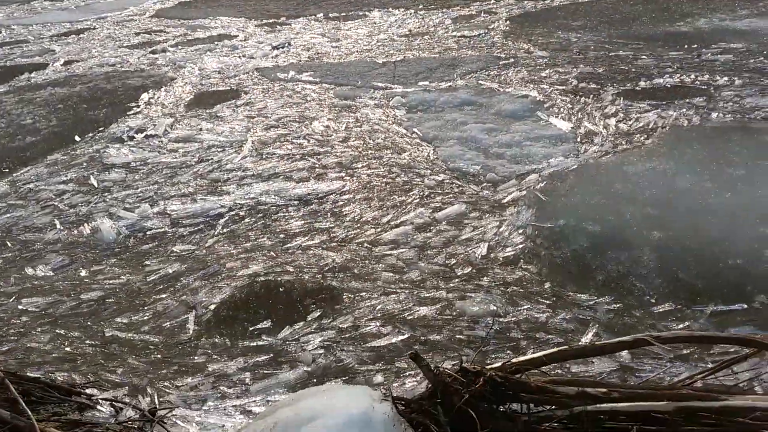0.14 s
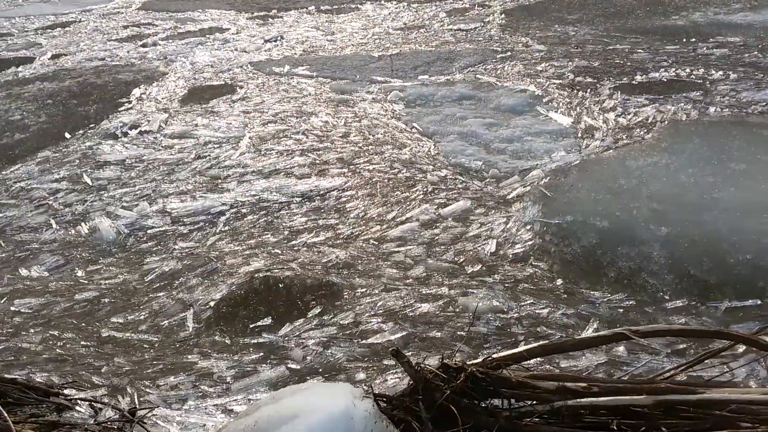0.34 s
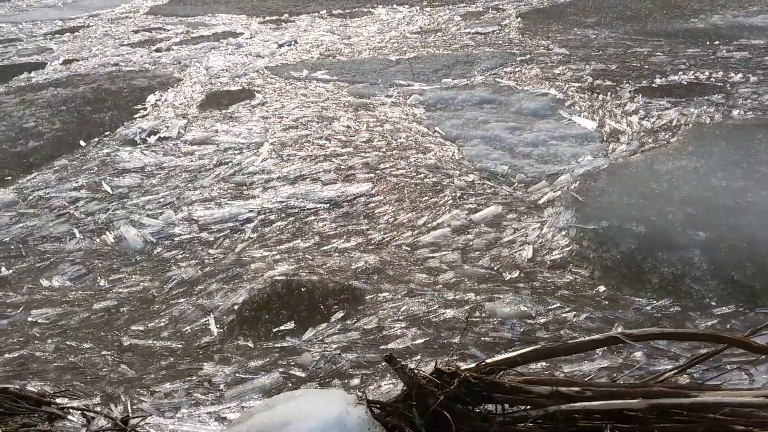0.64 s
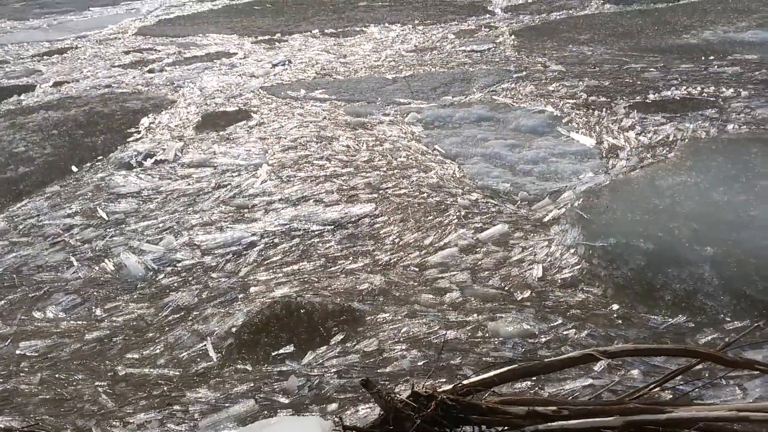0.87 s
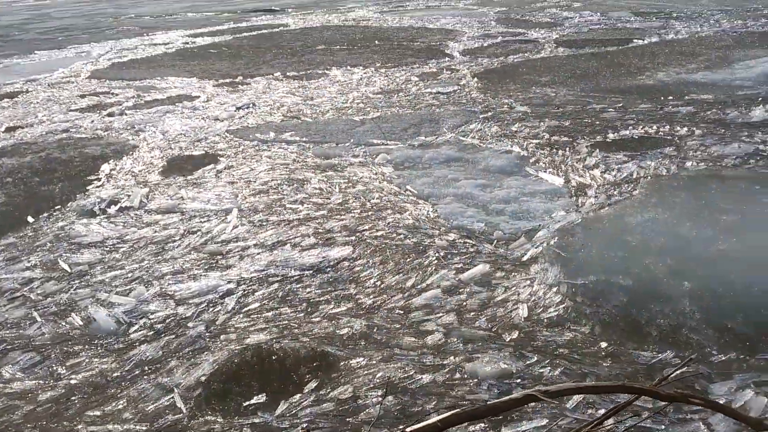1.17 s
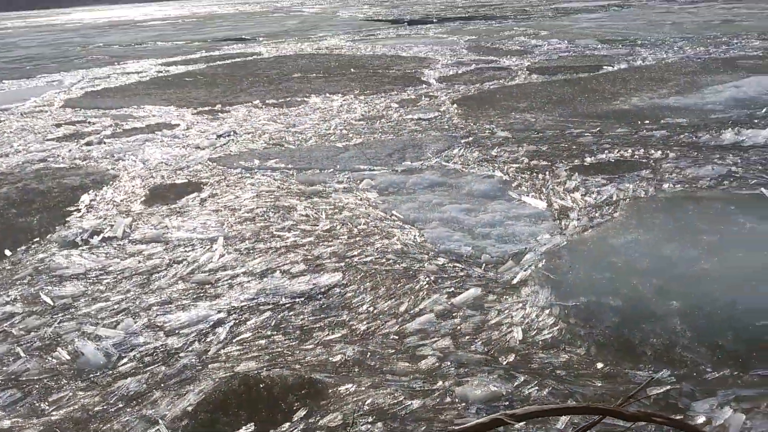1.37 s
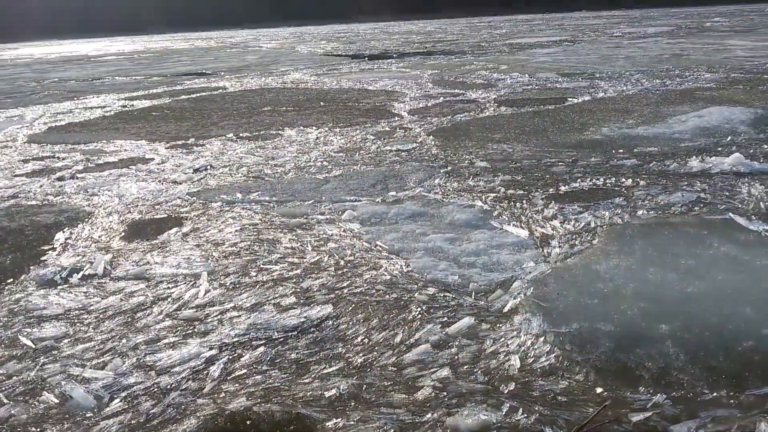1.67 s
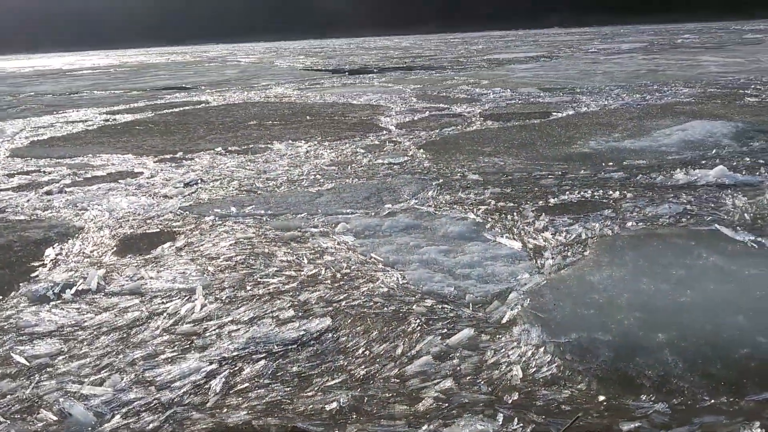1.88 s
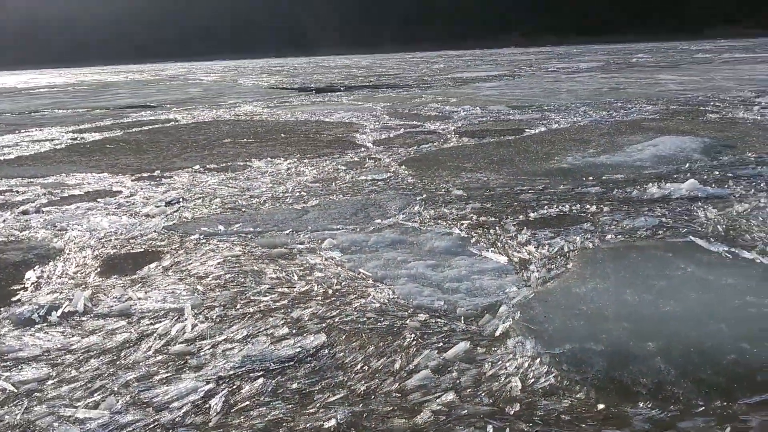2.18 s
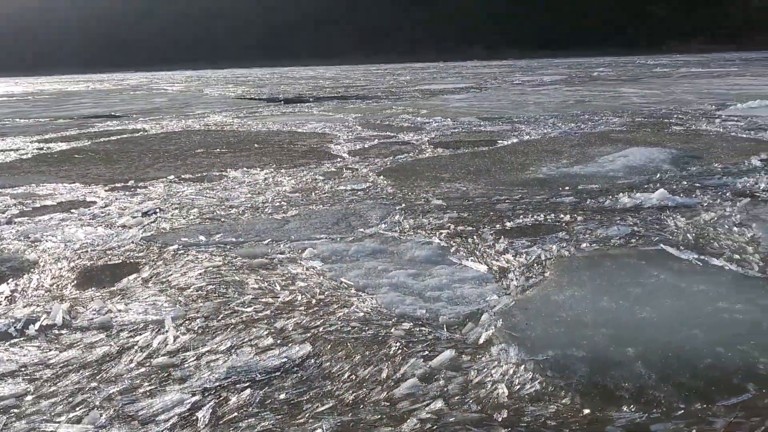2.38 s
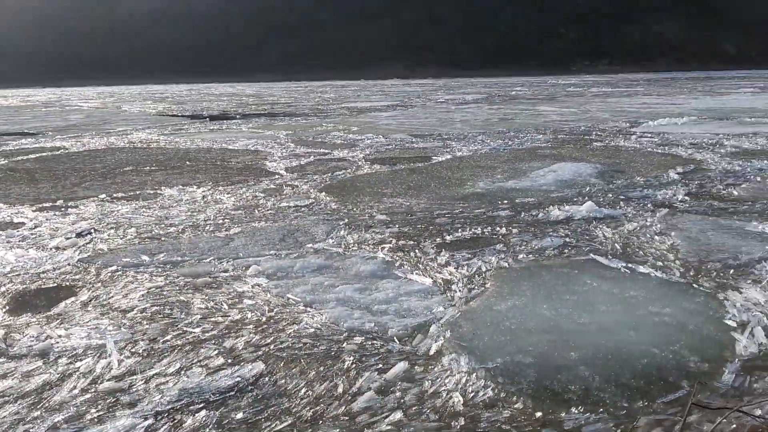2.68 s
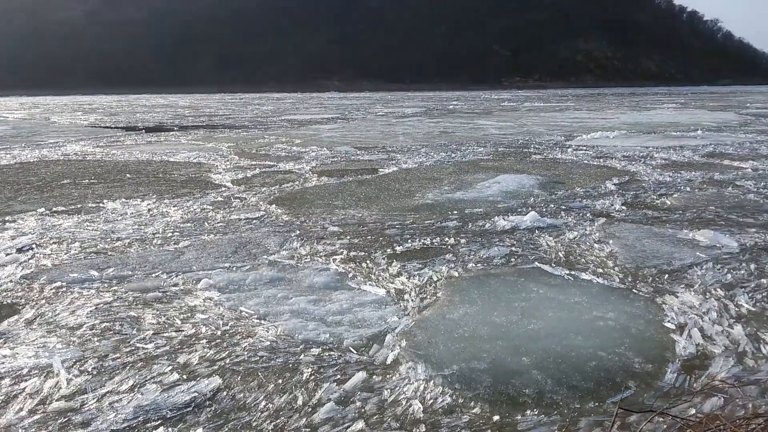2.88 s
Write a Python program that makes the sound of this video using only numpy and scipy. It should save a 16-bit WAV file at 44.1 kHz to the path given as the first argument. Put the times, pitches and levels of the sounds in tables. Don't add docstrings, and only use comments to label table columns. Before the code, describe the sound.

Dense grinding hiss of drifting river ice, clear little clinks, and low wind buffeting

```python
import sys
import numpy as np
from scipy import signal
from scipy.io import wavfile
from scipy.ndimage import uniform_filter1d

SR = 44100
rng = np.random.default_rng(int(sys.argv[2]) if len(sys.argv) > 2 else 0)


def digitize_waveform(pressure):
    field = np.atleast_2d(pressure).T
    bounded = np.clip(field, -1, 1)
    quanta = np.round(bounded * 32767).astype(np.int16)
    wavfile.write(sys.argv[1], SR, quanta)


def ratio_of_db(decibels):
    return 10 ** (np.asarray(decibels, float) / 20)


N = 133623


def evened(x):
    return x / np.sqrt(np.mean(x ** 2) + 1e-20)


def read_spectrum(points, hz):
    point_hz, db = np.transpose(points)
    return np.interp(np.log(hz + 1), np.log(point_hz + 1), db)


def follow(table, t, column):
    return np.interp(t, np.array(table)[:, 0], np.array(table)[:, column])


def add(mix, start_s, sound):
    part = mix[max(round(start_s * SR), 0):][:len(sound)]
    part += sound[:len(part)]


def recolour(x, field_db, size):
    shape = dict(nperseg=size, noverlap=size * 3 // 4)
    hz, t, z = signal.stft(x, SR, **shape)
    z = z * ratio_of_db(field_db(hz[:, None], t))
    return signal.istft(z, SR, **shape)[1][:N]


def patches(hz, t, size):
    z = rng.standard_normal((len(t), len(hz))).T
    z = uniform_filter1d(z, size[0], axis=0)
    return evened(uniform_filter1d(z, size[1], axis=1))


def ice():
    # time in seconds, level in dB, extra brightness in dB.
    grinding = [(0.0, -23.5, -6.5), (0.07, -21, -7.5), (0.09, -18, -8.5), (0.25, -22.5, -7.5),
                (0.72, -25, -7.5), (0.77, -23, -7), (1.65, -24, -8), (1.66, -23, -8), (1.75, -23.5, -7.5),
                (1.8, -21, -8.5), (2.02, -23.5, -5), (2.13, -25, -5.5), (2.22, -20.5, -11),
                (2.37, -26, -5.5), (2.62, -22.5, -7), (2.84, -25, -7), (3.0, -25, -6.5), (3.03, -25.5, -9)]
    # pitch in Hz, strength in dB per Hz.
    slush = [(350, -23), (600, -14.5), (972, -10.5), (1580, -4), (2690, -2), (3010, -1.5), (4250, -10),
             (6290, -10.5), (12500, -33), (16200, -78), (22000, -120)]
    # pitch in Hz, width in Hz, boost in dB.
    mic_peaks = [(1880, 450, 3.5), (3244, 200, 1.5), (5460, 3060, -0.5)]

    def colour_db(hz, t):
        peaks = sum(db * np.exp(-((hz - centre) / width) ** 2) for centre, width, db in mic_peaks)
        bright = follow(grinding, t, column=2)
        bright = (bright - bright.mean()) * np.clip(np.log2((hz + 1) / 3500) / 0.8, 0, 1)
        flicker = 0.64 * patches(hz[:1], t, size=(1, 8))
        mottle = 1.25 * patches(hz, t, size=(4, 10))
        return read_spectrum(slush, hz) + peaks + bright + mottle + flicker

    raw = rng.standard_normal(N) + ratio_of_db(-13.5) * shards()
    level_db = follow(grinding, np.arange(N) / SR, column=1) - 0.5
    return ratio_of_db(level_db) * evened(recolour(raw, colour_db, size=512))


def shards(per_s=500, spread_db=2.5, cycles=8.1):
    out, t = np.zeros(N), np.arange(600) / SR
    for hz in np.geomspace(1200, 7500, 30):
        strike = rng.random(N) < per_s / 30 / SR
        size = ratio_of_db(spread_db * np.minimum(rng.exponential(1, N), 5)) * strike
        u = t * hz / cycles
        ring = evened(u * np.exp(-3 * u) * np.sin(2 * np.pi * hz * t))
        out += signal.oaconvolve(size, ring * np.sqrt(hz / 3000))[:N]
    return evened(out)


def tinks(t60=0.018):
    # start in seconds, peak level in dB, pitch in Hz.
    knocks = [(0.038, 7, 2590), (0.0714, 4, 2320), (0.8344, 5, 2430), (1.0954, -36, 2060),
              (1.665, 13, 3070), (1.7955, 6, 3380), (2.0294, -11, 1740), (2.4518, 8.5, 1550),
              (2.603, 6, 1970), (2.6494, -10, 3110), (2.971, 9, 2240)]
    out, t = np.zeros(N), np.arange(2000) / SR
    for start_s, db, hz in knocks:
        fade = ratio_of_db(db - 19.5 - 60 * t / t60)
        attack = np.minimum(t / 0.002, 1)
        add(out, start_s, fade * attack * np.sin(2 * np.pi * hz * t))
    return out


def gusts():
    # start in seconds, peak level in dB, pitch in Hz, length in seconds.
    thumps = [(2.207, -10, 325, 0.024), (0.297, -15.5, 237, 0.045), (.645, -27, 277, .01),
              (0.758, -7.5, 378, 0.011), (.795, -11.5, 328, .03), (.862, -22, 200, 0.0085),
              (0.917, -10, 315, 0.028), (0.921, -12, 314, 0.028), (1.071, -9.5, 270, 0.016),
              (1.092, -8.5, 250, 0.036), (1.111, -7.5, 292, 0.01), (1.213, -15.5, 315, 0.01),
              (1.535, -11, 246.5, 0.037), (1.793, -8, 476, 0.015), (1.858, -12.5, 242, 0.015),
              (1.916, -6.5, 277, 0.019), (1.926, -7, 396, 0.0081), (2.187, -5.5, 211.4, .04),
              (2.269, -12.5, 336, 0.0066), (2.609, -7.5, 386, 0.0082), (2.4274, -2.5, 288, 0.0065),
              (2.518, -7, 242, 0.028), (2.535, -4.5, 302, 0.016), (2.565, -4.5, 406, 0.029),
              (2.585, -3.5, 162, 0.024), (2.601, -8, 250, 0.017), (2.91, -7.5, 530, 0.0097),
              (2.9346, 4.5, 388, 0.0065), (2.961, -11, 232, .02), (2.974, -10.5, 299.5, 0.05)]
    gap_cycles, eddy_cycles, pitch_spread = 1.4, 1.234, 0.305
    fade_db, follow_db, cut_hz = -7.5, -5, 105
    out, t = np.zeros(N), np.arange(1500) / SR
    chance = rng.standard_normal((len(thumps), 12, 3))
    for (start_s, db, hz, length_s), draws in zip(thumps, chance):
        delay = 0.0
        for k, (pitch_draw, level_draw, phase_draw) in enumerate(draws):
            later = k > 0
            eddy_hz = hz * np.exp((pitch_spread * pitch_draw - 0.15) * later)
            share = delay / max(length_s, 0.004)
            size = ratio_of_db(db - 0.64 + fade_db * share ** 2 + (follow_db + 2.3 * level_draw) * later)
            u = np.pi * t * eddy_hz / eddy_cycles
            swell = u ** 2 * np.exp(2 - 2 * u)
            push_pull = np.sin(2 * np.pi * eddy_hz * t + np.pi * phase_draw)
            add(out, start_s + delay, size * swell * push_pull)
            delay += gap_cycles / eddy_hz
    low_cut = signal.butter(N=3, Wn=cut_hz, btype="high", fs=SR, output="sos")
    return signal.sosfilt(low_cut, out)


def breeze():
    # time in seconds, level in dB.
    wind = [(0.0, -31.5), (0.62, -30.5), (0.94, -26.5), (1.03, -27), (1.19, -36), (1.82, -36.5),
            (2.21, -32.5), (2.4, -31), (2.58, -40.5), (2.89, -27.5), (2.99, -16.5), (3.03, -39)]
    # pitch in Hz, strength in dB per Hz.
    flutter = [(12, -66), (20, -34), (113, -4), (237, -2.5), (375, -9), (528, -15.5), (808, -28.5),
               (1000, -24.5), (1300, -49), (2200, -120)]

    def colour_db(hz, t):
        jumps = 2.7 * np.clip(hz / 160, 0, 1) * patches(hz[:1], t, size=(1, 2))
        return read_spectrum(flutter, hz) + jumps + patches(hz, t, size=(3, 4))

    level_db = follow(wind, np.arange(N) / SR, column=1) + 3.0
    return ratio_of_db(level_db) * evened(recolour(rng.standard_normal(N), colour_db, size=1024))


def scene():
    return (ice() + tinks() + gusts() + breeze())[None]


def wind_guard(dry, start_db=-24, share=0.26, fall_db_per_s=30.5):
    low = signal.sosfilt(signal.butter(2, 600, fs=SR, output="sos"), dry)[0]
    low_db = 10 * np.log10(abs(uniform_filter1d(low ** 2, size=400)) + 1e-12)
    fall = np.arange(N) * fall_db_per_s / SR
    held_db = np.maximum.accumulate(low_db + fall) - fall
    over_db = np.clip(held_db - start_db, 0, 14)
    lift = ratio_of_db(share * uniform_filter1d(over_db, size=300))
    return low + (dry - low) * lift


def gate(x, limit_db=-66, tilt_db_per_khz=-0.1):
    shape, lead = dict(window="cosine", nperseg=2048, noverlap=1024), 672
    hz, t, z = signal.stft(np.pad(x, ((0, 0), (lead, 0))), SR, **shape)
    limit = ratio_of_db(limit_db + tilt_db_per_khz * (hz / 1000 - 10)) * (hz > SR / 8)
    return signal.istft(z * (abs(z) > limit[:, None]), SR, **shape)[1][:, lead:lead + N]


def band_limit(x):
    return signal.sosfilt(signal.butter(12, 14300, fs=SR, output="sos"), x)


def record(dry):
    hiss = ratio_of_db(-44.3) * np.diff(rng.standard_normal(N + 1))
    noisy = wind_guard(dry) + hiss
    finished = gate(np.clip(noisy, -1, 1))
    return band_limit(finished)


dry = scene()
out = record(dry)
digitize_waveform(out)
```